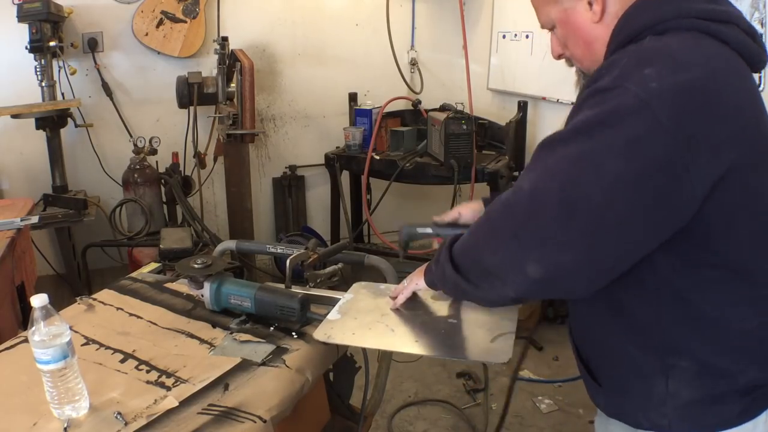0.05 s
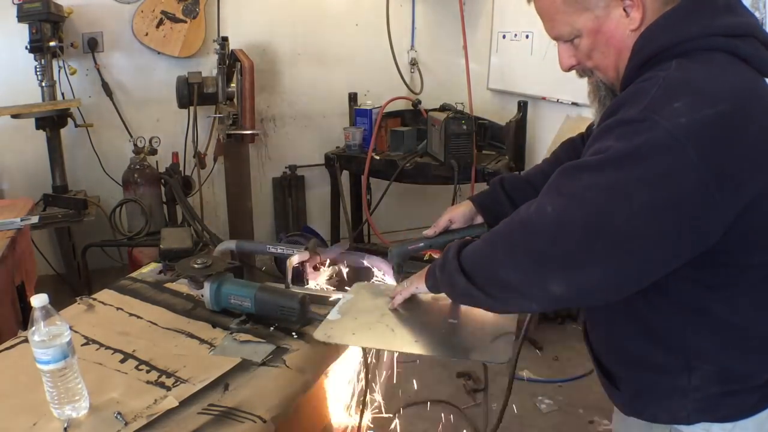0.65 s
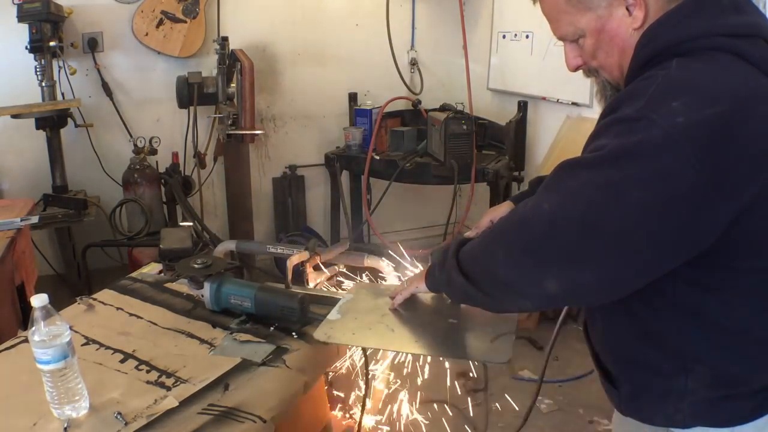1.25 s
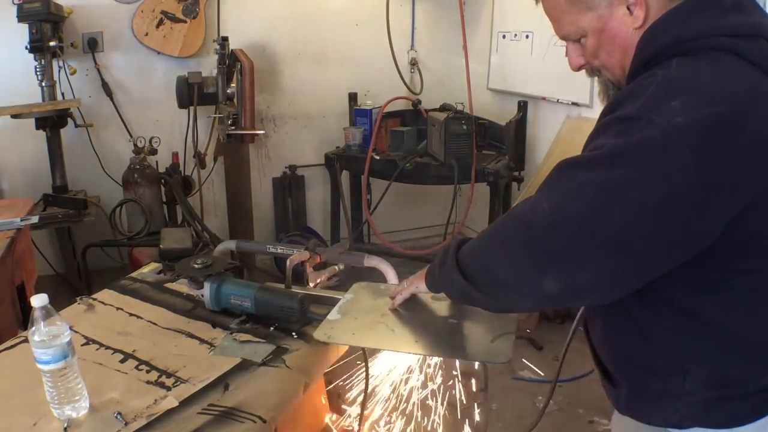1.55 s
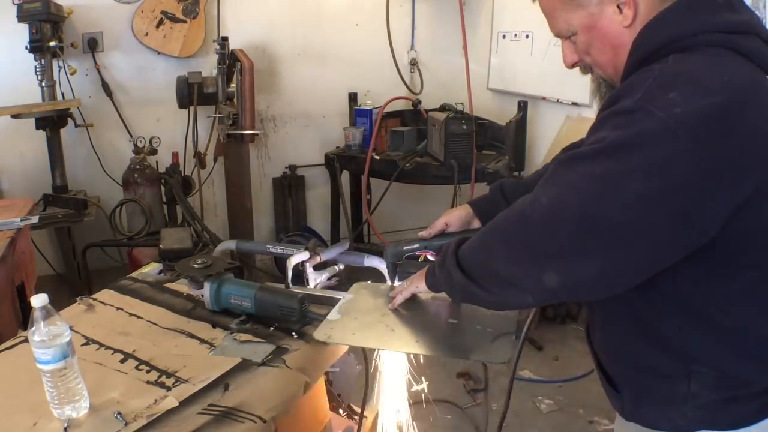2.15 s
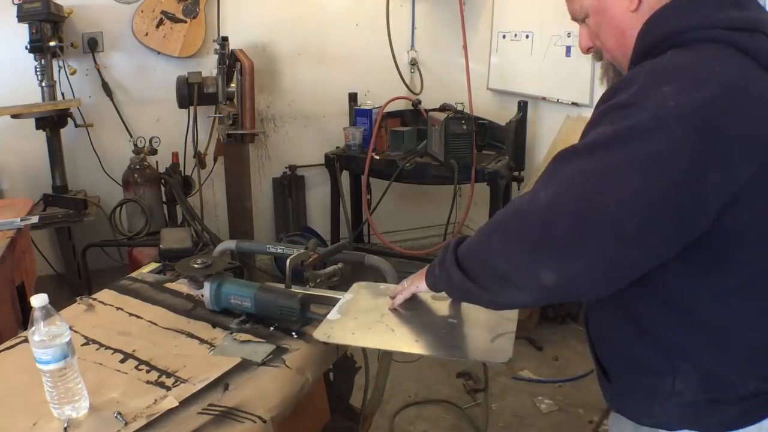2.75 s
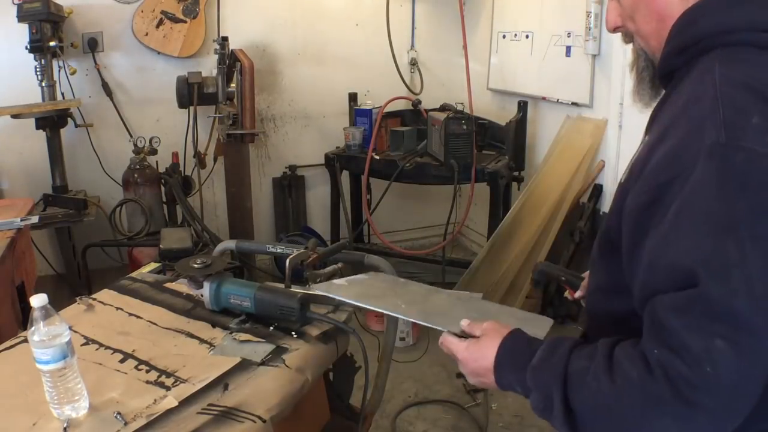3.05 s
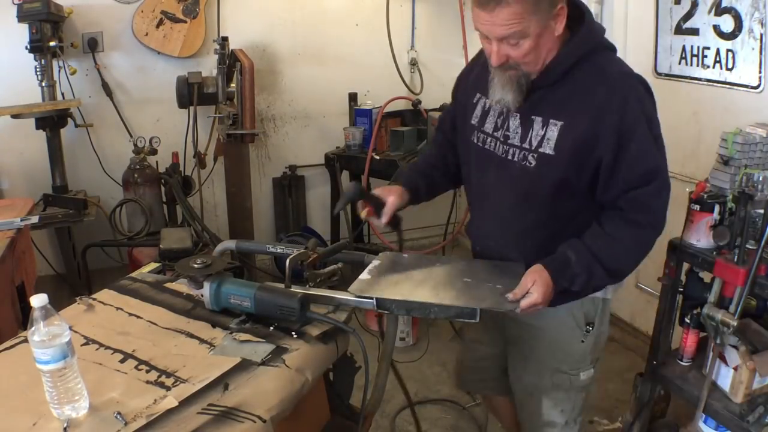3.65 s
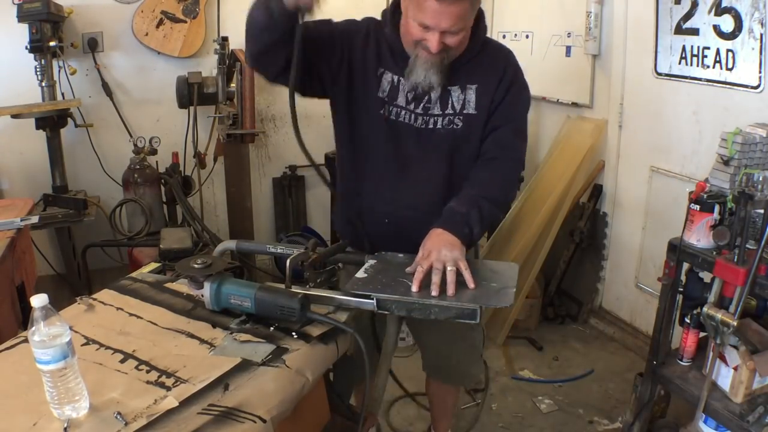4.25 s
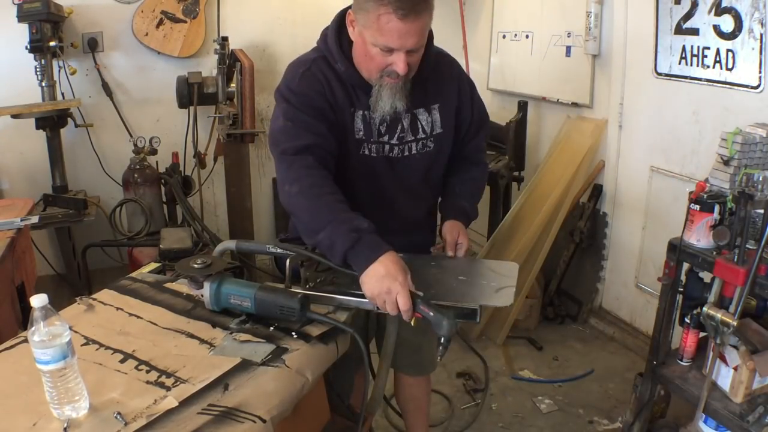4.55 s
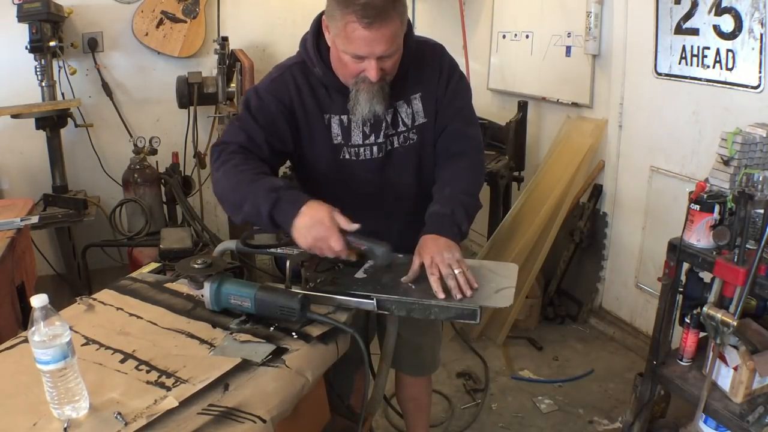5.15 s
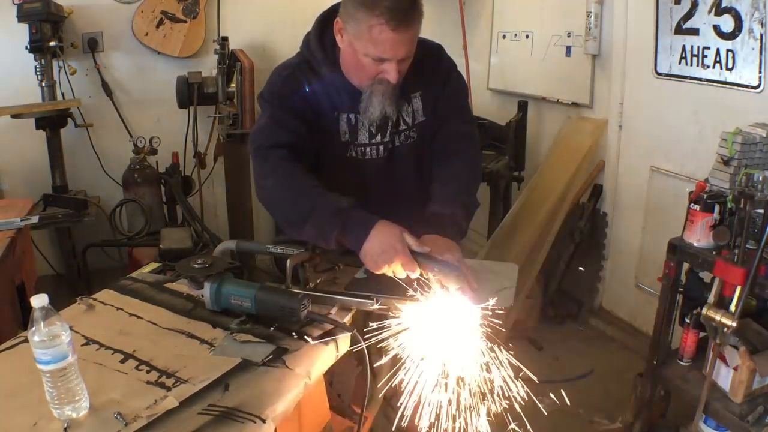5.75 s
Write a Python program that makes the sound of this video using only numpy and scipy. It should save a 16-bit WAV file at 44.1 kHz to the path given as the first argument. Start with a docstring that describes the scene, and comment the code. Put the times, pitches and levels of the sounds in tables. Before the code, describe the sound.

Hissing plasma cuts spit molten metal, pause while air rushes and a steel sheet clanks on a bench, then start again.

```python
"""A handheld plasma torch cuts a steel sheet in a small workshop, over the faint rush and whine of a fan.
The torch slides and taps on the sheet, its air valve clacks and the arc pops alight: the jet hisses and
molten steel sputters through two cuts. The air keeps flowing and grazes the steel while the sheet squeaks
free, then knocks and scrapes on the bench as it is turned, set down and lined up.
The valve clacks again and a third cut starts."""
import sys
import numpy as np
from scipy import signal
from scipy.fft import rfft, irfft, next_fast_len
from scipy.io import wavfile
from scipy.ndimage import map_coordinates

SR = 44100
rng = np.random.default_rng(int(sys.argv[2]) if len(sys.argv) > 2 else 0)


def master(y):
    """Save y as 16-bit WAV."""
    cut = np.clip(np.atleast_2d(y).T, -1, 1)
    pcm = np.round(cut * 32767)  # scale
    wavfile.write(sys.argv[1], SR, pcm.astype(np.int16))


N = 255780
T = np.arange(N) / SR
TOP_HZ = 15780
# The sheet's modes. Each row: frequency in Hz, level in dB, t60 in seconds.
SHEET_MODES = [(1050, -11, .05), (1800, -2, .08), (1910, -6, .05), (2410, -7, .05), (2805, -16, .27),
               (2960, 0, .06), (3160, -3, .06), (4550, -5, .04), (4856, -5, .04), (6220, 4, .04),
               (7700, -7, .04), (9250, -6, .05), (11330, 0, .045), (11690, -2, .04), (14200, -8, .04)]


def amp(db):
    """Decibels to gain."""
    return 10 ** (np.asarray(db) / 20)


def unit(x):
    """Scale to rms 1."""
    return x / np.sqrt(np.mean(x ** 2) + 1e-20)


def along(points, hz):
    """(Hz, value) points read on a log axis."""
    point_hz, values = np.transpose(points)
    return np.interp(np.log(hz + 1), np.log(point_hz + 1), values)


def wobble(knots_per_s):
    """Smooth random curve of rms 1."""
    return unit(map_coordinates(rng.standard_normal(int(N * knots_per_s / SR) + 4), [T * knots_per_s]))


def filtered(x, response):
    """Apply a gain given as a function of Hz."""
    size = next_fast_len(N + SR // 2)
    return irfft(rfft(x, size) * response(np.fft.rfftfreq(size, 1 / SR)), size)[:N]


def coloured(x, colour):
    """Apply a spectrum of (Hz, dB) points, cut off at TOP_HZ."""
    return filtered(x, lambda hz: amp(along(colour, hz)) * (hz < TOP_HZ))


def noise(colour):
    """Noise of rms 1 with a spectrum of (Hz, relative dB) points."""
    return unit(coloured(rng.standard_normal(N), colour))


def resonant(x, peaks):
    """Apply (Hz, width Hz, dB) resonances and notches; rms 1."""
    def response(hz):
        return amp(sum(db / (1 + (2 * (hz - centre) / width) ** 2) for centre, width, db in peaks))
    return unit(filtered(x, response))


def fade(t, t60_s):
    """Exponential decay from t = 0."""
    return (t >= 0) * np.exp(-np.log(1000) * np.maximum(t, 0) / t60_s)


def gate(start_s, end_s, t60_s):
    """On at once, decaying after the end."""
    return (T >= start_s) * fade(np.maximum(T - end_s, 0), t60_s)


def stroke(start_s, length_s, rise_s, t60_s):
    """Smooth rise, hold, decay."""
    rise = np.sin(np.pi / 2 * np.clip((T - start_s) / rise_s, 0, 1)) ** 2
    return rise * gate(start_s, start_s + length_s, t60_s)


def strokes(rows, rise_s, t60_s):
    """Gain of (start s, length s, dB) strokes; the loudest wins."""
    return np.max([amp(db) * stroke(start, length, rise_s, t60_s) for start, length, db in rows], axis=0)


def bump(centre_s, half_width_s):
    """Bell-shaped swell of height 1."""
    return np.exp(-np.minimum(((T - centre_s) / half_width_s) ** 2, 20))


def nearby(x, share):
    """Close surfaces add fine comb ripples that shift as the torch travels; rms 1."""
    t = np.arange(SR // 40) / SR
    reflections = rng.standard_normal((2, len(t))) * fade(t - .001, .045)
    one, other = (signal.fftconvolve(x, taps / np.linalg.norm(taps))[:N] for taps in reflections)
    travel_rad = 2 * np.pi * .2 * T
    return unit(x + share * (np.cos(travel_rad) * one + np.sin(travel_rad) * other))


def machine():
    """A cooling fan rushes and whines faintly."""
    # Fan noise. Each row: frequency in Hz, relative level in dB.
    rush_colour = [(15, -60), (25, -37), (137, -45), (324, -5), (540, 0.5), (1180, -4.5), (2800, -6.5),
                   (3380, -19), (3860, -1), (4190, -22), (4800, -8), (6110, -19), (15700, -7)]
    # Steady tones. Each row: frequency in Hz, rms level in dB.
    tones = [(790, -90), (3833, -85), (4791, -93), (7666, -99)]
    whine = sum(amp(db) * np.sqrt(2) * np.sin(2 * np.pi * hz * T + 0.38 * wobble(44)) for hz, db in tones)
    return amp(-77.8) * noise(rush_colour) + whine


def handling():
    """Torch and hose slide on the sheet with a short rasp."""
    # Each row: start in seconds, length in seconds, level in dB.
    slides = [(0.074, 0.03, -49.5), (0.163, .028, -59.5), (0.189, .014, -53.5), (3.003, 0.019, -44)]
    colour = [(200, -14.5), (1200, -15.0), (3000, -6), (5000, -3), (9000, 5.5), (15500, 4.0)]
    rasp = nearby(noise(colour), share=0.21)
    return rasp * strokes(slides, rise_s=0.014, t60_s=0.039) * amp(1.7 * wobble(250))


def knocks():
    """Each contact cracks and rings the sheet's modes; the grip damps and detunes them."""
    # Steel on steel. Each row: time in seconds, level in dB, most strongly driven pitch in Hz,
    # relative ring level in dB, factor on the modes' t60.
    contacts = [(0.085, -51.5, 3100, 7.5, 0.4), (0.2422, -59, 5000, -20, .5), (0.27, -62.5, 10000, -6, .3),
                (0.275, -65, 3000, 0, .5), (0.3132, -43, 1900, -11, .9), (2.891, -44.5, 2000, -8, .5),
                (3.0284, -27, 2980, -0.5, 0.92), (3.036, -35.5, 3000, 0, 0.87),
                (3.485, -33.5, 3200, -7, 0.65), (3.487, -43.5, 1050, -2, 0.65),
                (3.491, -41.5, 1900, 2, 0.69), (3.5187, -44, 4970, 3, 0.94), (3.5918, -60, 11400, 13, 3),
                (3.7043, -37, 8000, -13, .6), (3.7952, -24, 12000, -10, 0.36),
                (3.8, -42.5, 1850, 2.5, 0.71), (3.826, -42.5, 3000, -1, 1.1), (4.166, -45, 2000, -12, .4),
                (4.2875, -38, 1780, -7.5, 0.65), (4.3286, -55.5, 1750, 7, 1.4), (4.911, -46, 2400, -14, .5),
                (5.060, -42.5, 3000, -5, 0.7), (5.1542, -36, 11400, -1, .7),
                (5.1763, -31.5, 11400, 4, 0.76), (5.2036, -36, 11400, 7, 0.63)]
    hz, mode_db, t60_s = np.transpose(SHEET_MODES)[:, :, None]
    t = np.arange(SR // 2) / SR
    attack = 1 - fade(t, .004)
    ring, crack = np.zeros(N + SR), np.zeros(N)
    for at_s, db, pitch_hz, ring_db, sustain in contacts:
        rolloff = (1 + (np.log2(hz / pitch_hz) / .28) ** 2) ** .7
        gains = amp(mode_db + 1.5 * rng.standard_normal(hz.shape)) / rolloff
        detuned_hz = hz * (1 + .008 * rng.standard_normal(hz.shape))
        phase = 2 * np.pi * (detuned_hz * t + rng.random(hz.shape))
        modes = gains * np.sin(phase) * attack * fade(t, sustain * t60_s)
        ring[round(at_s * SR):][:len(t)] += amp(db + ring_db) * modes.sum(0) / np.linalg.norm(gains)
        crack += amp(db) * (fade(T - at_s, .02) + .25 * fade(T - at_s, .06))
    crack_colour = [(60, -42), (300, -34), (700, -37), (1050, -25.0), (1900, -8.0), (3700, -9.0),
                    (4800, -0.5), (8000, -4.5), (11500, 1.5), (15500, -1.5)]
    return ring[:N] + amp(-2.0) * crack * noise(crack_colour)


def valve():
    """The solenoid clacks when the trigger is pressed."""
    # Each row: time in seconds, level in dB.
    clacks = [(0.3132, -47.5), (2.118, -33.5), (5.289, -33)]
    # Clack spectrum. Each row: frequency in Hz, relative level in dB.
    colour = [(100, -59), (400, -15), (800, -20), (1200, -18.5), (2000, 0), (3300, -9), (4700, 1),
              (5800, -15.5), (7000, -6.5), (10000, -8.5), (15500, -10)]
    return noise(colour) * sum(amp(db) * fade(T - at_s, t60_s=0.06) for at_s, db in clacks)


def pops():
    """The arc cracks like a small spark as it strikes, spits or snaps off."""
    # Each row: time in seconds, level in dB, t60 in seconds.
    cracks = [(0.369, -37.5, 0.023), (0.377, -29, 0.015), (0.649, -38, .015), (0.872, -29, 0.025),
              (1.021, -34.5, 0.028), (1.2448, -34, .03), (1.9505, -25.5, 0.033), (2.1447, -42, .035),
              (2.150, -37, .03), (2.7875, -28.5, 0.033), (5.368, -56, 0.05), (5.3819, -37.5, 0.04),
              (5.3892, -29, 0.03), (5.439, -28, 0.015)]
    colour = [(100, -26.0), (1100, -2.5), (1800, 3.5), (3000, -3.5), (7000, -3.0), (15000, 5.5)]
    return noise(colour) * sum(amp(db) * fade(T - at_s, t60_s) for at_s, db, t60_s in cracks)


def air():
    """Compressed air leaves the nozzle, louder and brighter where it grazes the steel."""
    # Valve open. Each row: start in seconds, end in seconds.
    flows = [(0.369, 2.119), (2.143, 5.294), (5.381, 5.9)]
    # Free and grazing jet spectra. Each row: frequency in Hz, relative level in dB.
    free_colour = [(15, -30), (25, -13), (250, -12), (1800, -12.5), (3500, -14), (6200, -13), (9000, -9.5),
                   (12500, -5.5), (14400, -2.5), (15600, 1.5)]
    graze_colour = [(900, -51), (1800, -35), (3300, -24.5), (4000, -15), (5800, -14), (7200, -9.5),
                    (9000, -4), (11000, -3), (15700, -6.5)]
    # Edge tones and notches. Each row: centre in Hz, width in Hz, gain in dB.
    edge_peaks = [(4060, 230, 2.5), (4630, 150, 3.5), (6940, 200, 3.5), (7870, 350, 5), (9100, 130, -10),
                  (10150, 250, -2), (11800, 300, -1), (13200, 500, -9), (14030, 200, 4)]
    # Jet on the sheet's edge. Each row: start in seconds, length in seconds, level in dB.
    grazes = [(2.02, .07, -51), (3.35, .018, -54.5), (3.503, .022, -47), (3.577, 0.076, -51),
              (3.699, .024, -48), (3.757, 0.028, -43.5), (3.808, 0.026, -39.5), (3.846, 0.12, -44.5),
              (3.956, 0.18, -43.5), (4.14, 0.026, -46), (4.295, .018, -51), (4.356, .024, -45),
              (4.401, .062, -46.5), (5.022, 0.11, -52), (5.241, 0.043, -45.5)]
    # The torch is close over the sheet, lifted away, then brought back round.
    close_db, lift_s, lifted_db, return_db_per_s = -49, 2.79, -57, 1.0
    level_db = np.where(T < lift_s, close_db, lifted_db + return_db_per_s * (T - lift_s))
    valve_open = sum(gate(start_s, end_s, t60_s=0.06) for start_s, end_s in flows)
    free = nearby(noise(free_colour), share=0.32) * valve_open * amp(level_db + 0.37 * wobble(40))
    edge = nearby(resonant(noise(graze_colour), edge_peaks), share=0.74)
    return free + edge * strokes(grazes, rise_s=0.02, t60_s=0.092) * amp(0.7 * wobble(95))


def jet(start_s, end_s, colour, peaks):
    """The plasma jet hisses, eases as the cut goes on, and flutters."""
    # The jet breaks through, pierces or falters.
    # Each row: time in seconds, half width in seconds, treble gain in dB, body gain in dB.
    flares = [(0.449, .005, 5.5, 3), (0.602, .004, 3, 4), (0.755, .012, 2.5, 2), (0.91, 0.018, 2.5, 2),
              (1.42, .02, 1.5, -0.5), (1.53, .025, 2.5, 1), (1.72, .012, 2, 2), (1.789, .006, 4, 1.5),
              (2.19, 0.044, -2.5, -3), (2.305, .007, 8, 1), (2.337, 0.018, 7, 1), (2.484, .005, 7, 0),
              (2.765, 0.029, 7, 3), (5.411, .005, -4, -8), (5.444, .012, 2, 6.5), (5.497, .02, 3.5, 3.5),
              (5.771, 0.015, 3, 6)]
    split_hz, sag_db_per_s = 6460, 0.7
    strike_db = 5.5 * fade(T - start_s, t60_s=0.12)  # overshoot as the arc takes hold
    sag_db = sag_db_per_s * (np.clip(T, start_s, end_s) - (start_s + end_s) / 2)
    treble_db, body_db = sum(np.outer(gains_db, bump(at_s, half_width_s))
                             for at_s, half_width_s, *gains_db in flares if start_s < at_s < end_s)
    hiss = nearby(resonant(noise(colour), peaks), share=.45)
    body = filtered(hiss, lambda hz: 1 / (1 + (hz / split_hz) ** 4))
    flaring = body * amp(body_db) + (hiss - body) * amp(treble_db + strike_db)
    flutter_db = wobble(400)
    return flaring * amp(flutter_db - sag_db)


def sputter(start_s, end_s, level_db, peaks):
    """Molten steel is blown out of the kerf in clumps of uneven drops and brief sprays."""
    # Each row: time in seconds, level in dB.
    sprays = [(0.478, -48), (0.602, -43), (0.650, -45), (0.81, -46), (0.985, -43.5), (1.13, -47),
              (1.25, -40), (1.66, -50), (1.795, -46), (2.424, -46.5), (5.44, -45), (5.48, -44),
              (5.508, -43), (5.768, -42)]
    colour = [(200, -26), (1200, -17.5), (1700, -0.5), (3000, -4.5), (7000, -3), (15000, -2.5)]
    drops_per_s, spread_db, clump_db = 1400, 4.5, 2.2
    impulses = (rng.random(N) < drops_per_s / SR) * rng.choice([-1, 1], N)
    drops = impulses * amp(spread_db * np.clip(rng.standard_normal(N), -2, 2))
    spits = resonant(coloured(drops, colour), peaks)
    spray = sum(amp(db) * bump(at_s, half_width_s=0.012) for at_s, db in sprays if start_s < at_s < end_s)
    return spits * (amp(level_db) + spray) * amp(clump_db * wobble(220))


def cut(burn, colour, peaks):
    """Jet and sputter surge together as the arc root jumps along the cut."""
    start_s, end_s, hiss_db, sputter_db = burn
    surge = wobble(100)
    hiss = jet(start_s, end_s, colour, peaks) * amp(hiss_db + 1.4 * surge)
    melt = sputter(start_s, end_s, sputter_db + 2.5 * surge, peaks)
    return gate(start_s, end_s, t60_s=0.062) * (hiss + melt)


def arc():
    """Two cuts along the side of the sheet, one at its front."""
    # Arc alight. Each row: start in seconds, end in seconds, hiss in dB, sputter in dB.
    burns = [(0.377, 1.953, -37.5, -50.5), (2.150, 2.79, -37, -55), (5.389, 5.9, -36, -54)]
    # Hiss spectra. Each row: frequency in Hz, relative level in dB.
    side_colour = [(15, -30), (25, -16), (370, -16.5), (700, -16), (1350, -15.5), (1600, -14), (3500, -13),
                   (6500, -11), (8500, -7), (11000, -4.5), (13000, -3), (14300, -3.2), (14900, 0),
                   (15700, 1)]
    front_colour = [(15, -30), (25, -14.5), (330, -16), (480, -12.5), (1800, -11), (3500, -11), (6000, -11),
                    (8500, -8), (11000, -5), (14500, -3), (15700, -1)]
    # Resonances and notches of sheet and bench. Each row: centre in Hz, width in Hz, gain in dB.
    side_peaks = [(1750, 240, 5), (2370, 170, 5), (3200, 220, 3), (3820, 120, -5), (4160, 300, 3),
                  (4560, 130, -4), (4980, 160, 4), (5270, 130, -4), (5520, 140, 8), (5980, 240, -4),
                  (6330, 110, 4), (8380, 150, 3), (8820, 130, 5), (9100, 250, -3), (11650, 200, 4),
                  (13240, 180, 3.5), (14800, 150, 3)]
    front_peaks = [(1800, 400, 1.5), (6400, 150, 3), (6750, 150, 3), (8200, 250, 6), (9480, 150, 5),
                   (10330, 300, 6), (11030, 150, 3), (11350, 250, -3), (12100, 250, 3), (12860, 180, 6),
                   (15430, 250, 5)]
    side = sum(cut(burn, side_colour, side_peaks) for burn in burns[:2])
    return side + cut(burns[2], front_colour, front_peaks)


def squeak():
    """The sheet sticks and slips as it is pulled free; pitch sags and overtones fade as the force eases."""
    # Each row: harmonic number, relative level in dB.
    partials = [(1, 1.5), (2, 3.5), (3, -15), (4, -4)]
    start_s, full_force_hz, sag_share = 2.849, 2957, 0.035
    force = stroke(start_s, length_s=0.022, rise_s=0.0033, t60_s=0.045) * fade(T - start_s, t60_s=0.47)
    pitch_hz = full_force_hz * (1 - sag_share * (1 - force))
    phase = 2 * np.pi * np.cumsum(pitch_hz * (1 + .02 * wobble(1100))) / SR
    tone = sum(amp(db + 3.3 * wobble(350)) * force ** (1.2 * (k - 1)) * np.sin(k * phase)
               for k, db in partials)
    return amp(-41.5) * force * tone


def scrape():
    """Grit under the sliding sheet makes a dense stream of tiny damped rings of scattered pitch."""
    # Sheet over bench. Each row: start in seconds, length in seconds, level in dB.
    drags = [(3.39, 0.011, -62), (3.49, 0.083, -59.5), (3.58, .075, -64.5), (3.703, 0.16, -55.5),
             (3.86, .045, -62), (4.15, .022, -57.5), (4.328, 0.13, -66), (4.947, 0.037, -63.5),
             (5.058, .025, -61.5), (5.18, .03, -61)]
    grain_count, median_hz, spread_db = 14000, 2800, 5
    t = np.arange(SR // 125) / SR
    hz = np.clip(median_hz * np.exp(0.412 * rng.standard_normal((grain_count, 1))), 900, 12000)
    gains = amp(spread_db * rng.standard_normal((grain_count, 1)))
    grains = gains * np.sin(2 * np.pi * hz * t) * fade(t, t60_s=0.014)
    positions = rng.integers(0, N, (grain_count, 1)) + np.arange(len(t))
    grit = np.bincount(positions.ravel(), grains.ravel(), N)[:N]
    sheet_peaks = [(mode_hz, 160, 3) for mode_hz, _, _ in SHEET_MODES]
    return resonant(grit, sheet_peaks) * strokes(drags, rise_s=0.012, t60_s=0.11)


def workshop(x):
    """The cluttered room answers with a short diffuse tail."""
    # Room decay. Each row: frequency in Hz, t60 in seconds.
    decay = [(200, 0.067), (2500, 0.13), (14000, 0.2)]
    hz, t, spectra = signal.stft(rng.standard_normal(SR // 2), SR, nperseg=256)
    tail = signal.istft(spectra * fade(t, along(decay, hz)[:, None]), SR, nperseg=256)[1]
    delayed_tail = np.pad(tail, (SR // 300, 0)) / np.linalg.norm(tail)
    return signal.fftconvolve(x, delayed_tail)[:N]


def scene():
    """Torch, sheet, room and fan, alike in both channels."""
    direct = arc() + pops() + air() + valve() + knocks() + scrape() + handling() + squeak()
    mono = direct + amp(-18.5) * workshop(direct) + machine()
    return np.array([mono, mono])


def record(dry):
    """Steep low-pass at TOP_HZ."""
    def low_pass(hz, edge_hz=400):
        return np.sin(np.pi / 2 * np.clip((TOP_HZ - hz) / edge_hz + .5, 0, 1)) ** 2
    return np.array([filtered(channel, low_pass) for channel in dry])


dry = scene()
out = record(dry)
master(out)
```